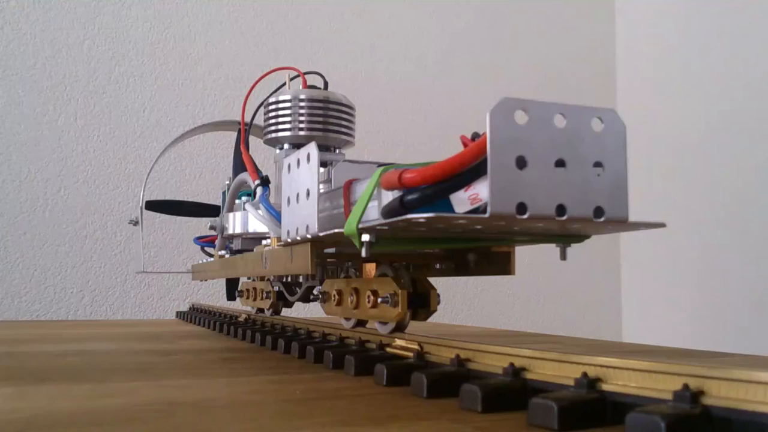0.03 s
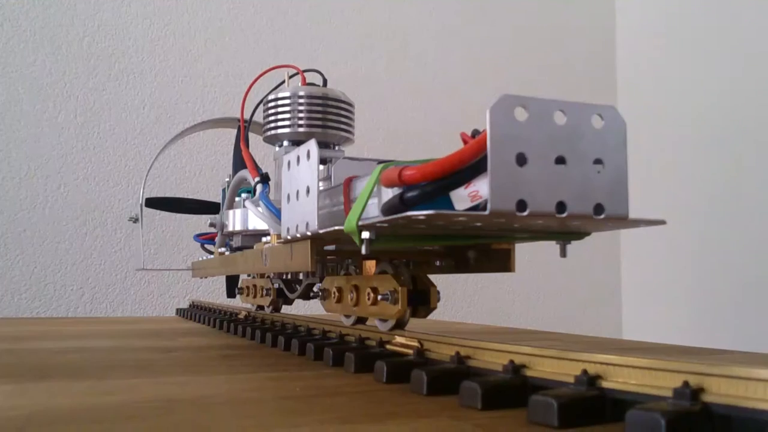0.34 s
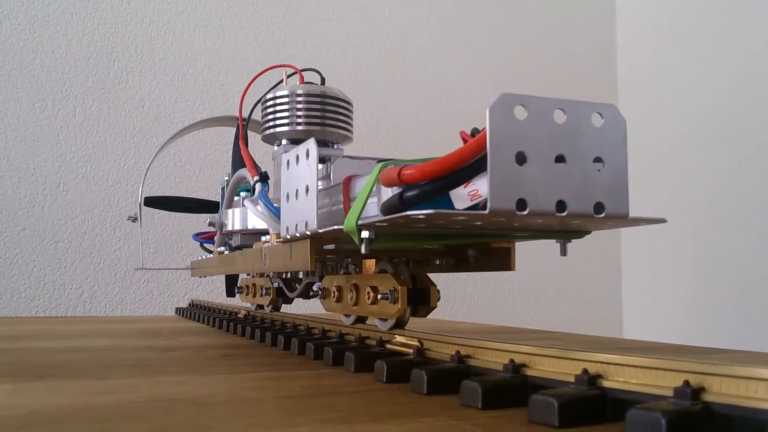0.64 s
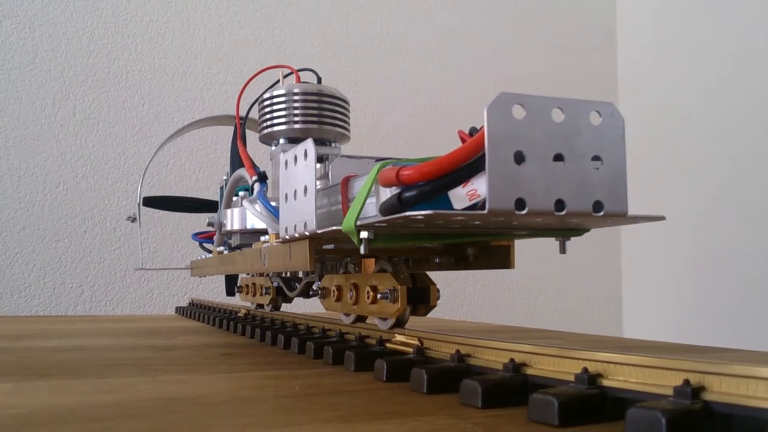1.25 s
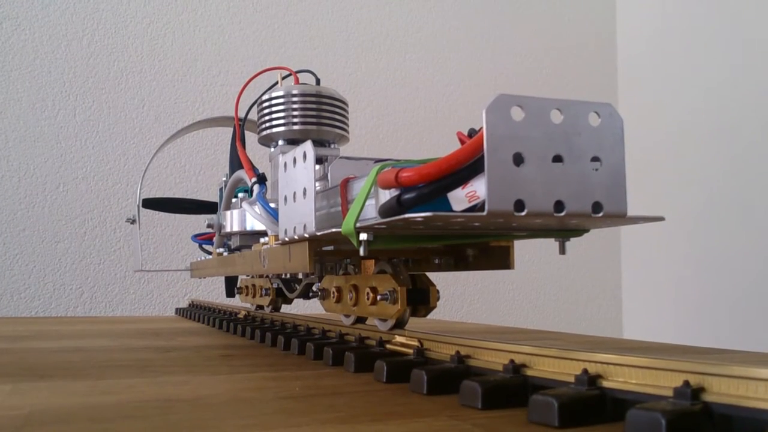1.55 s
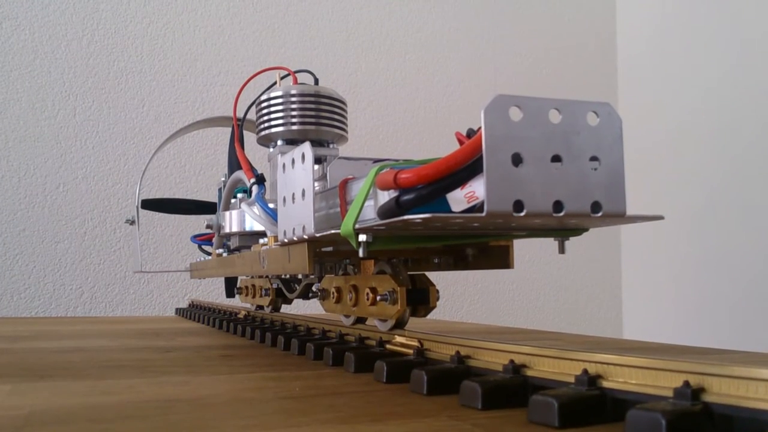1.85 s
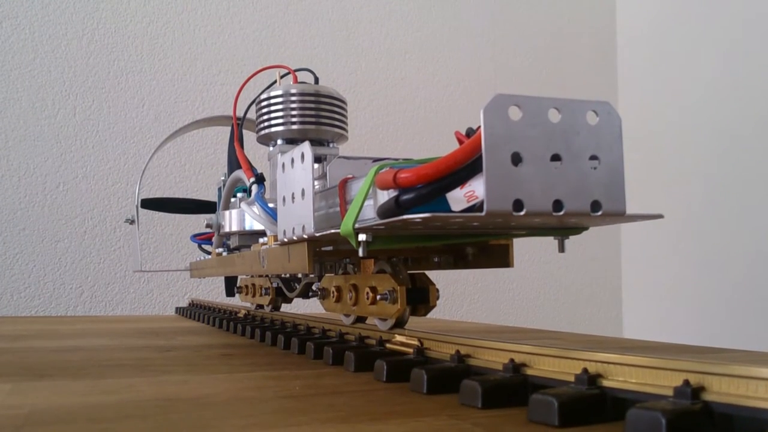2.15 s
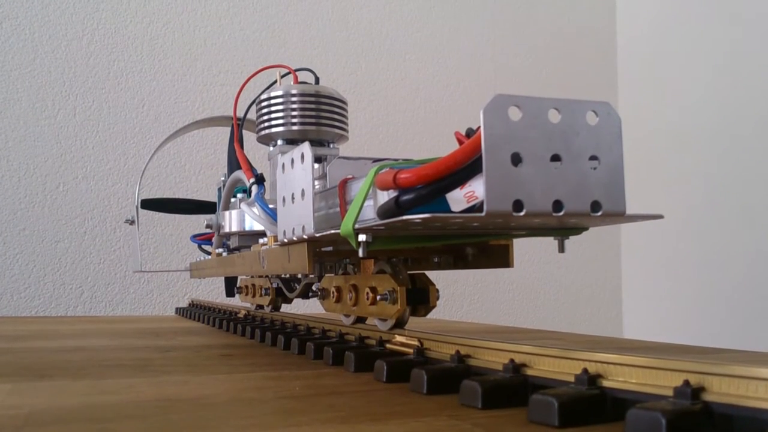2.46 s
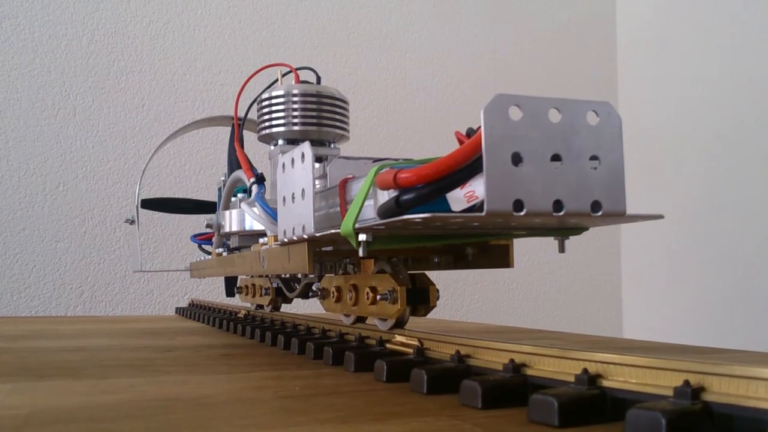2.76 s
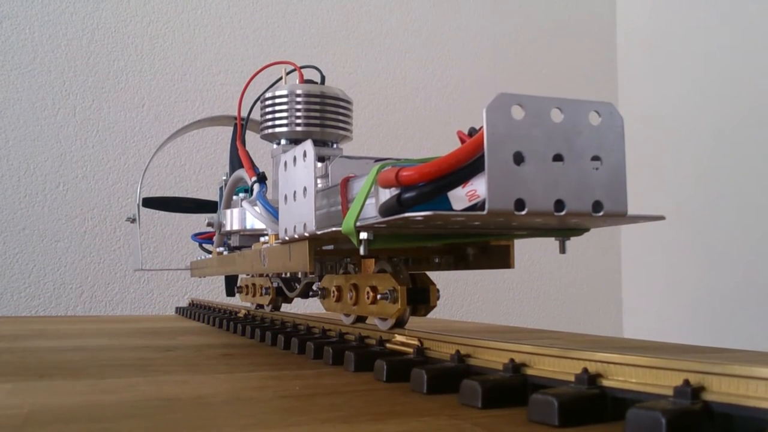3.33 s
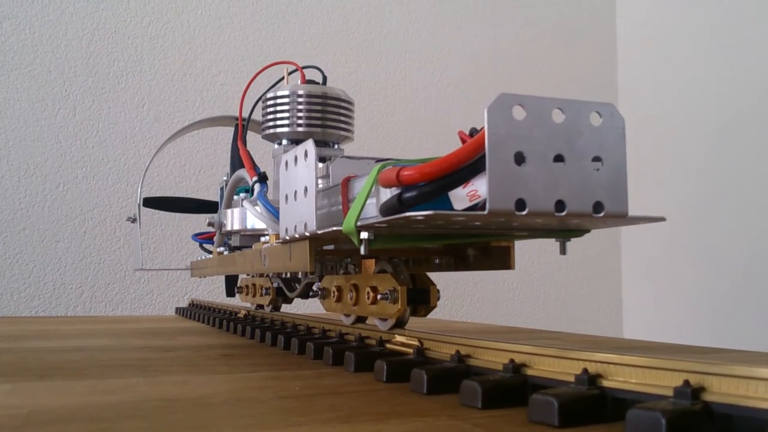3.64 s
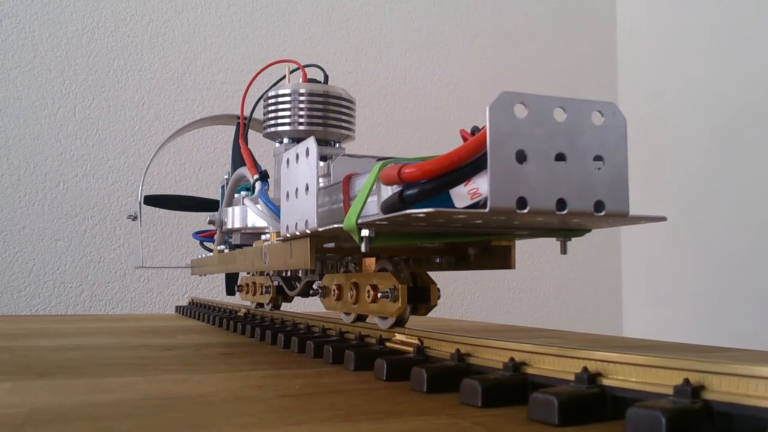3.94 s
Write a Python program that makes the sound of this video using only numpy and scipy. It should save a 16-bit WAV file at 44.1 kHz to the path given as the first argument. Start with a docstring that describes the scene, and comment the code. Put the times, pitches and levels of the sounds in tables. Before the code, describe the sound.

Close up indoors, a spinning gyroscope and its little motor whirr and hum at a nearly constant speed. A shrill, hissing rattle from the bearing dips repeatedly, returns suddenly and holds, then dips again near the end.

```python
"""In a room, close by, a small model monorail car balances on its track with a spinning gyroscope.
The unbalanced rotor hums at a nearly steady speed, its motor whines and whirrs, and the frame rings.
A bearing chatters once a turn, ringing the metal near 9 kHz, while its balls whistle and hiss.
As the gyroscope rocks, the load on the bearing eases again and again, so the bright chatter pulses."""
import sys
import numpy as np
from scipy import signal
from scipy.fft import rfft, irfft
from scipy.io import wavfile
from scipy.ndimage import uniform_filter1d

SR = 44100
rng = np.random.default_rng(int(sys.argv[2]) if len(sys.argv) > 2 else 0)


def materialize(psi):
    """Save the field psi as 16-bit PCM at rate SR to the path in sys.argv[1].

    A 1-D psi becomes a single channel; in a 2-D psi each row is a channel.
    """
    bounded = np.clip(np.atleast_2d(psi).T, -1, 1)
    quanta = np.round(bounded * 32767).astype(np.int16)
    wavfile.write(sys.argv[1], SR, quanta)


N = 176400
T, FREQS = np.arange(N) / SR, np.arange(N // 2 + 1) * SR / N
ROTOR_HZ = 289.64
KNOCK_TURNS, GRAIN_DB = .28, .9  # fade time of a bearing knock; graininess of the bearing's noise


def undb(db):
    """Turn decibels into a gain."""
    return 10 ** (np.asarray(db) / 20)


def unit(x):
    """Scale a signal to an average power of 1."""
    return x / np.sqrt(np.mean(x ** 2))


def curve(rows, column=1):
    """Join the points of a time table with straight lines."""
    rows = np.array(rows)
    return np.interp(T, rows[:, 0], rows[:, column])


def over_hz(rows):
    """Fill in a frequency table at every frequency."""
    rows = np.array(rows)
    return np.interp(np.log(FREQS + 1), np.log(rows[:, 0]), rows[:, 1])


def walk(rate_hz):
    """A smooth random wander, about 1 in size."""
    hold = int(SR / rate_hz)
    steps = np.repeat(rng.standard_normal(N // hold + 1), hold)[:N]
    return unit(uniform_filter1d(uniform_filter1d(steps, hold), hold))


def swell(middle_s, length_s):
    """A flat-topped rise from 0 to 1 and back."""
    return np.exp(-(2 * (T - middle_s) / length_s) ** 8)


def sides(pan_db):
    """Left and right gains. Pan is how much louder the left side is."""
    return undb(np.array([[1], [-1]]) * pan_db / 2)


def ring(hz, width):
    """A filter for one narrow ringing note."""
    return 1 / (1 + 1j * (FREQS - hz) / width) ** 2


def repeating(share):
    """A filter for roughness that partly returns each turn: a hump at each multiple of the speed."""
    return 1 / (1 - share * np.exp(-2j * np.pi * FREQS / ROTOR_HZ))


def tone(turns, multiple, pan_db, flicker_db, wobble_rad, scatter_rad=np.pi):
    """A wavering tone at a multiple of the turning speed; high ones differ in phase left and right."""
    apart = np.array([[0], [np.pi / 2]]) * (multiple > 10)
    phase = 2 * np.pi * multiple * turns + scatter_rad * rng.standard_normal() + apart
    wave = np.sqrt(2) * np.cos(phase + wobble_rad * walk(70))
    return wave * sides(pan_db) * unit(undb(flicker_db * walk(25.07)))


# Where the noise sits between the ears. Each row: frequency in Hz, pan in dB.
NOISE_PAN = [(60, 3.5), (200, 7), (380, 11.5), (700, 8), (1300, 6), (2400, 0), (4400, 1), (7000, -0.5),
             (8700, -3.5), (9700, -9), (11000, -9), (12200, -3), (15000, -10.5)]
# How alike left and right are. Each row: frequency in Hz, likeness from 0 to 1.
LIKENESS = [(60, 0.5), (200, 1), (640, 0.98), (1400, 0.24), (2600, 0.81), (3400, 0), (15000, 0.02)]

def friction(colour, drive=1):
    """Stereo rubbing noise, shaped in time by drive and in frequency by colour."""
    mid, side = rfft(rng.standard_normal((2, N)) * drive)
    alike = np.clip(over_hz(LIKENESS), 0, 1)
    pair = mid * np.sqrt(1 + alike) + np.array([[1], [-1]]) * side * np.sqrt(1 - alike)
    return unit(irfft(pair * colour * sides(over_hz(NOISE_PAN)), N))


def ringing(rows):
    """Rubbing noise keeps several notes ringing at once."""
    return sum(undb(db) * friction(ring(hz, width)) for hz, width, db in rows)


# The slow changes of load on the bearing. Each row: time in seconds, chatter strength in dB.
LOAD = [(.38, -2), (.75, -1.5), (1.0, -1.5), (1.33, -3), (1.57, -6), (1.72, -7.5), (1.78, -14),
        (1.955, -16), (1.985, 0), (2.1, -3), (2.7, -1), (3.27, -1.5), (3.62, -3), (3.9, -6.5), (4, 0.5)]
# Moments when rocking eases the load. Each row: middle in seconds, length in seconds, depth in dB.
EASES = [(0.545, 0.057, 1), (0.628, .05, 2), (0.738, 0.022, 3), (0.832, 0.08, 2.5), (0.943, 0.073, 3.5),
         (1.042, 0.081, 3.5), (1.152, 0.045, 3), (1.266, 0.045, 6), (1.393, 0.063, 8), (1.507, 0.076, 3),
         (1.648, 0.087, 5), (2.048, 0.045, 2), (2.182, 0.043, 2), (3.435, 0.041, 6.5), (3.545, 0.046, 8),
         (3.686, 0.076, 12), (3.824, 0.056, 12), (3.965, 0.069, 18)]

def bearing_load():
    """Chatter strength in dB: it dips at each rock and rebounds by 1 dB as the load returns."""
    delay_s, rebound_s = .027, .017
    dips = sum(depth * 0.5 ** (np.abs(2 * (T - s) / length) ** 3.7) for s, length, depth in EASES)
    rebounds = sum(np.exp(-((T - s - length / 2 - delay_s) / rebound_s) ** 2) for s, length, _ in EASES)
    return curve(LOAD) - dips + rebounds


HUM_MULTIPLES, HUM_PANS_DB = [1, 2, 4, 5, 7], [9.5, 11, 2.5, 11.5, -2]
# The hum's tones. Each row: time in seconds, then a relative level in dB for each multiple above.
HUM = [(0.42, -40.5, -43.5, -45.5, -49, -34.5), (0.69, -38.5, -42, -48.5, -54, -38.5),
       (1.15, -35.5, -40.5, -49.5, -42, -48), (1.74, -34.5, -39.5, -52, -40, -44.5),
       (1.83, -35, -39.5, -50, -38, -54), (2.02, -34.5, -40.5, -56, -38.5, -44),
       (2.28, -36, -40, -47.5, -40, -57), (2.61, -38, -43, -43.5, -46.5, -44.5),
       (3.07, -44.5, -43.5, -44.5, -38.5, -43.5), (3.15, -48, -43, -45, -41, -40.5),
       (3.72, -44.5, -42.5, -43, -41, -56), (3.97, -49.5, -43, -45, -39.5, -46)]

def rotor_hum(turns):
    """The unbalanced rotor shakes the car once a turn, making a hum with overtones."""
    hum = sum(undb(curve(HUM, i + 1)) * tone(turns, multiple, pan, flicker_db=.35, wobble_rad=.05)
              for i, (multiple, pan) in enumerate(zip(HUM_MULTIPLES, HUM_PANS_DB)))
    return undb(-1.45) * hum


# The whine's tones. Each row: multiple of the rotor speed, relative level in dB, pan in dB.
WHINE = [(3, -54, -7), (6, -47.5, -3), (8, -45, 6), (12, -45.5, 2), (14, -42.5, 2), (15, -41, 10),
         (16, -44, 5), (17, -42.5, 1), (19, -39, -5), (20, -51, -2), (24, -44, -4)]

def motor_whine(turns, load_db):
    """The motor's thin whine grows and shrinks with the load."""
    whine = sum(undb(db) * tone(turns, multiple, pan, flicker_db=3, wobble_rad=.21)
                for multiple, db, pan in WHINE)
    return whine * undb(-1.5 + .53 * load_db)


# The colour of the whirr. Each row: frequency in Hz, relative level in dB.
WHIRR_COLOUR = [(25, -34), (60, -18.5), (90, -7.5), (170, -3), (240, -9), (310, -5), (440, -12),
                (490, -16.5), (550, -5), (640, -14.5), (1000, -12), (1350, -4), (1600, 1), (2200, -2),
                (2700, 3), (3300, -5), (4500, -22)]

def motor_whirr(load_db):
    """The motor's grainy whirr follows the load only a little."""
    grain = undb(1.1 * walk(600))
    return friction(undb(over_hz(WHIRR_COLOUR)), grain) * undb(-31.5 + .15 * load_db)


# The frame's ringing notes. Each row: pitch in Hz, width in Hz, level in dB.
FRAME_RINGS = [(376, 5.4, -64), (412.5, 3.2, -48.5), (435.2, 10, -53), (685, 5, -62), (1238, 4, -57),
               (1530, 7, -47), (1698, 8, -50), (1739, 4, -50), (2011, 35, -46), (2530, 9, -47),
               (2729, 12, -47), (3740, 45, -49), (4160, 30, -44), (4470, 70, -45), (5650, 45, -47),
               (6230, 40, -45), (6740, 40, -47), (6860, 30, -50)]
# How loud the frame rumbles. Each row: time in seconds, level in dB.
RUMBLE_LEVEL = [(.4, -54.5), (.9, -52), (1.15, -46), (1.35, -54), (1.65, -42.5), (2.1, -50), (2.45, -47),
                (2.8, -49), (3.4, -55), (4, -53.5)]
# The rumble's low notes. Each row: pitch in Hz, width in Hz, relative level in dB.
RUMBLE_RINGS = [(125.1, 5.3, -0.5), (174.3, 17, -3)]

def frame_rings():
    """The shaken frame rings steadily over a low rumble that comes and goes."""
    return ringing(FRAME_RINGS) + undb(curve(RUMBLE_LEVEL)) * ringing(RUMBLE_RINGS)


# The colour of the scrape. Each row: frequency in Hz, relative level in dB.
SCRAPE_COLOUR = [(2000, -40), (4000, -22), (5600, -19), (6600, -9.5), (7200, -16), (7900, -4), (8600, 1),
                 (9600, -1), (10400, -6), (11100, -12), (12000, -13.5), (14500, -14.5), (15500, -26)]
# The notes of the bearing's metal housing. Each row: pitch in Hz, width in Hz,
# then relative levels in dB up to 1.6 seconds, just after that, and from 2.5 seconds on.
HOUSING_RINGS = [(8570, 35, -43, -37, -36), (8846, 14, -41, -32, -25.5), (8981, 18, -33, -32, -38),
                 (9120, 28, -34, -37, -37), (9639, 25, -44, -35, -30), (9830, 25, -34, -42, -42),
                 (10580, 28, -34, -37, -37), (11160, 35, -38, -42, -42)]
# How bright the chatter is. Each row: time in seconds, lift of the highs over the lows in dB.
BRIGHTNESS = [(.4, 4), (.8, -0.5), (1.25, 2.5), (1.75, -4), (1.98, 1.5), (2.7, 0), (3.3, -0.5), (4, -5)]

def bearing_chatter(turns, load_db):
    """The bearing gives a scraping knock on every turn, which rings its housing."""
    knock_share, split_hz, housing_s = .48, 9500, [1.6, 1.6, 2.5]
    sizes = undb(rng.standard_normal(N // 100))  # knocks vary by about 1 dB
    knocks = unit(sizes[turns.astype(int)] * np.exp(-(turns % 1) / KNOCK_TURNS))
    drive = np.sqrt(1 - knock_share + knock_share * knocks ** 2) * undb(GRAIN_DB * walk(2500))
    scrape = friction(undb(over_hz(SCRAPE_COLOUR)) * repeating(share=.38), drive)
    housing = sum(undb(np.interp(T, housing_s, levels)) * friction(ring(hz, width), drive)
                  for hz, width, *levels in HOUSING_RINGS)
    chatter = scrape * undb(-21 + load_db) + housing * undb(1 + .82 * load_db)
    lows = irfft(rfft(chatter) / (1 + (FREQS / split_hz) ** 20), N)
    lift = undb(curve(BRIGHTNESS) / 2)
    return lows / lift + (chatter - lows) * lift


# The buzz's tones. Each row: multiple of the rotor speed,
# relative levels in dB before and after the chatter surges back, pan in dB.
BUZZ = [(28, -39, -36, -10), (29, -40, -38, -8), (30, -31.5, -25, -5), (31, -27, -27, -7),
        (32, -35, -31.5, -4), (33, -36.5, -29.5, -17), (34, -37, -35, -6), (35, -34, -36, -4),
        (36, -30, -39, -3), (37, -33, -35, -7), (38, -30.5, -33, -16), (39, -41, -41, -20),
        (40, -45, -39, -8), (41, -49, -45, -10), (43, -49, -47, -5), (50, -49, -46, -8)]

def bearing_buzz(turns, load_db, surge_s=1.96):
    """The pitched part of the chatter needs firm contact, so it drops steeply as the load eases."""
    buzz = 0
    for multiple, before, after, pan in BUZZ:
        wave = tone(turns - KNOCK_TURNS, multiple, pan, flicker_db=2.5, wobble_rad=.39, scatter_rad=.99)
        buzz += undb(np.where(T < surge_s, before, after)) * wave
    return buzz * undb(-2 + 1.4 * load_db)


# The balls' whistling notes. Each row: pitch in Hz, width in Hz, relative level in dB.
BALL_RINGS = [(9960, 34, -29.5), (10200, 45, -30), (10320, 90, -32), (12900, 59, -48), (14480, 80, -48)]
# The colour of their hiss. Each row: frequency in Hz, relative level in dB.
HISS_COLOUR = [(2000, -37), (3000, 3), (3800, -0.5), (4300, 5), (4800, -1), (5400, 4), (6400, -5),
               (7200, -5), (8500, -4.5), (9600, -5), (10700, -4.5), (11900, -1), (15500, -28)]
# How much hiss returns on the next turn. Each row: frequency in Hz, share from 0 to 1.
HISS_REPEAT = [(3000, .25), (4200, .35), (4800, .7), (7500, .7), (8500, .35), (15000, .4)]

def rolling_balls(load_db):
    """The bearing's balls roll all the time, with a high whistle and a hiss."""
    whistle = ringing(BALL_RINGS)
    colour = undb(over_hz(HISS_COLOUR)) * repeating(over_hz(HISS_REPEAT))
    hiss = friction(colour, drive=undb(GRAIN_DB * walk(1500)))
    return whistle * undb(.21 * load_db) + hiss * undb(-31.5 + .39 * load_db)


# Spells of droning. Each row: middle in seconds, length in seconds, level in dB.
DRONES = [(2.8, 0.19, -43.5), (3.13, 0.42, -46.5)]

def frame_drone(hz=432):
    """The frame drones and flutters twice during the hardest stretch of chatter."""
    flutter = tone(hz * T, 1, pan_db=9, flicker_db=2.5, wobble_rad=1.2)
    return flutter * sum(undb(db) * swell(middle, length) for middle, length, db in DRONES)


def hum_throb(turns, throb_hz=14.6):
    """Near the end, the hum's lowest tone throbs slightly as it fades."""
    throb = np.sqrt(2) * np.cos(2 * np.pi * throb_hz * T)
    lowest = tone(turns, 1, HUM_PANS_DB[0], flicker_db=3.5, wobble_rad=.05)
    return undb(-52.5) * swell(middle_s=3.45, length_s=1.3) * throb * lowest


def room(sound, fade_s=.18, echo_db=-8.5):
    """The walls add a short, faint echo."""
    tail = unit(rng.standard_normal((2, N)) * undb(-60 * T / fade_s)) / np.sqrt(N)
    return sound + undb(echo_db) * signal.fftconvolve(sound, tail, axes=1)[:, :N]


def scene():
    """Mix the rotor, motor, frame and bearing; only the bearing gets the room's echo."""
    speed_hz = ROTOR_HZ * (1 + .0003 * walk(20))
    speed_hz += 2.2 * swell(middle_s=.65, length_s=.09025)  # the speed jumps up briefly
    turns = np.cumsum(speed_hz) / SR
    load_db = bearing_load()
    rotor = rotor_hum(turns) + hum_throb(turns)
    motor = motor_whine(turns, load_db) + motor_whirr(load_db)
    frame = frame_rings() + frame_drone()
    bearing = bearing_chatter(turns, load_db) + bearing_buzz(turns, load_db) + rolling_balls(load_db)
    return rotor + motor + frame + room(bearing)


def record(dry):
    """The sound cuts in out of silence, and the highest treble is cut off."""
    start_s, top_hz = .383, 15400
    lowpass = signal.ellip(10, .1, 80, top_hz, fs=SR, output="sos")
    return signal.sosfilt(lowpass, dry * (T >= start_s))


dry = scene()
out = record(dry)
materialize(out)
```